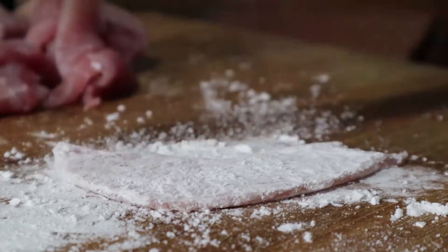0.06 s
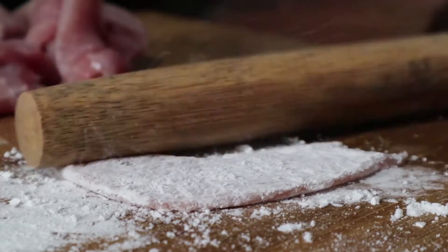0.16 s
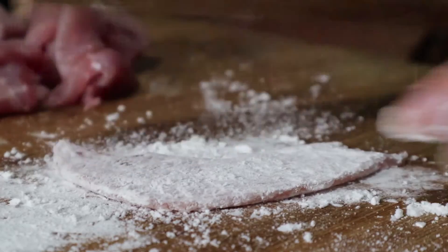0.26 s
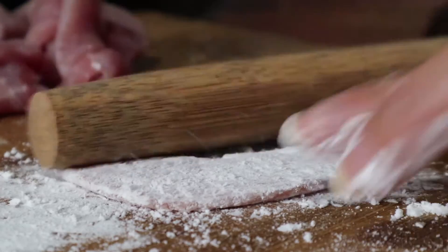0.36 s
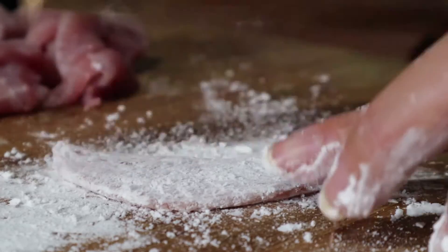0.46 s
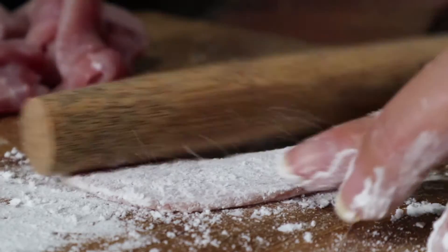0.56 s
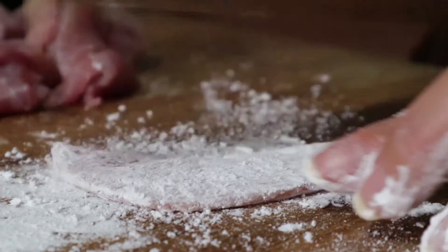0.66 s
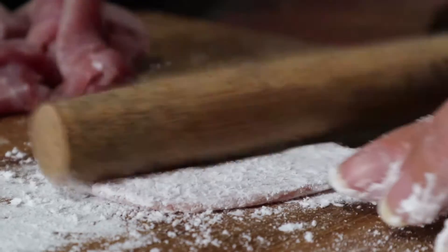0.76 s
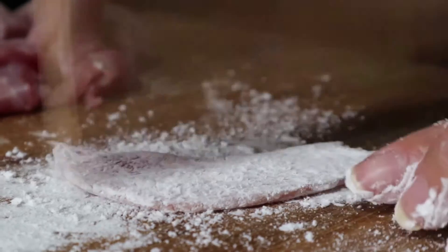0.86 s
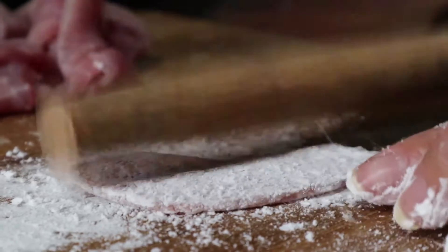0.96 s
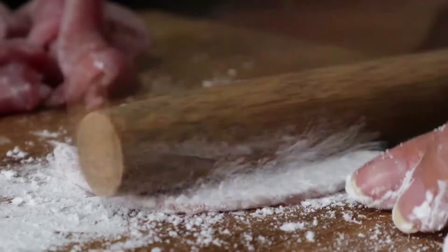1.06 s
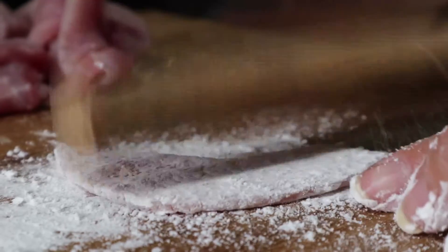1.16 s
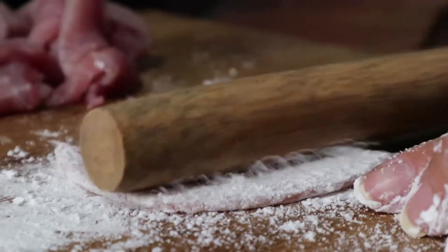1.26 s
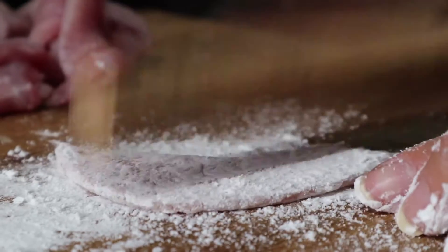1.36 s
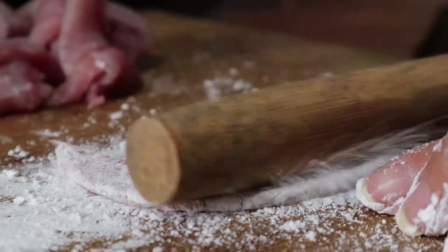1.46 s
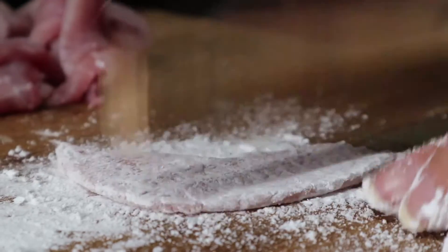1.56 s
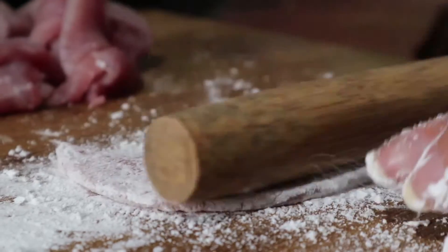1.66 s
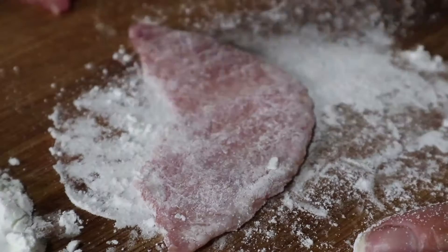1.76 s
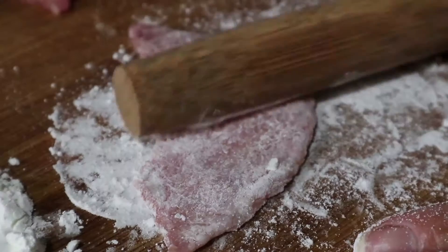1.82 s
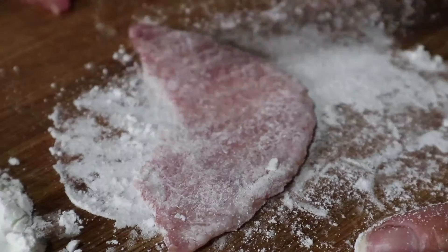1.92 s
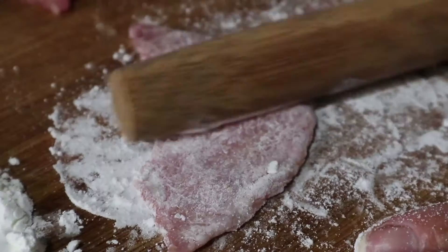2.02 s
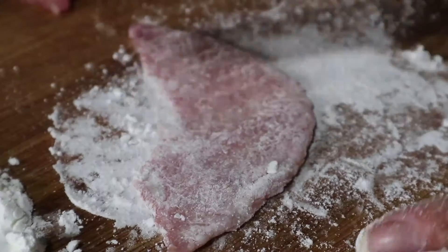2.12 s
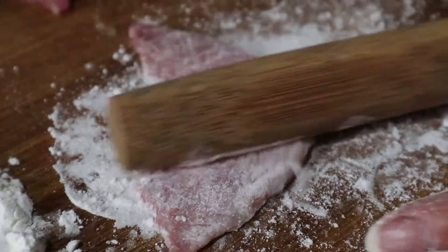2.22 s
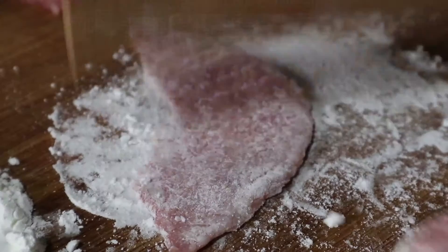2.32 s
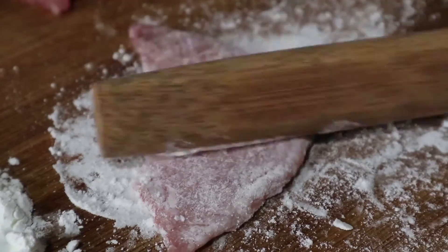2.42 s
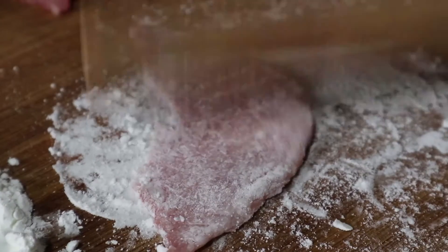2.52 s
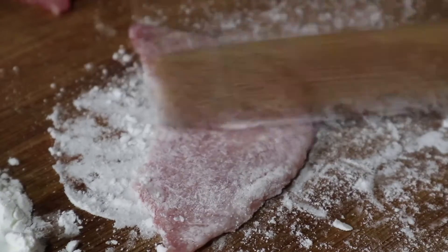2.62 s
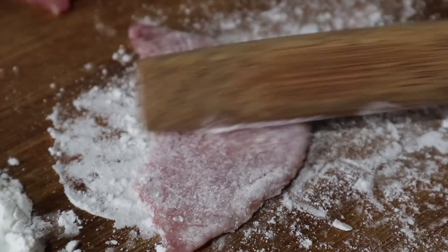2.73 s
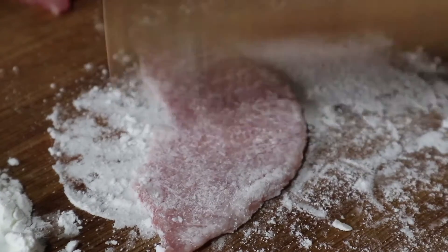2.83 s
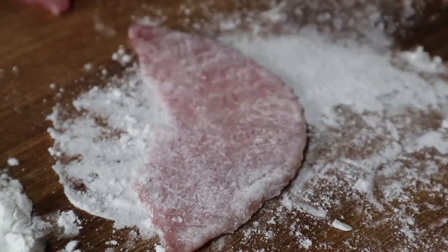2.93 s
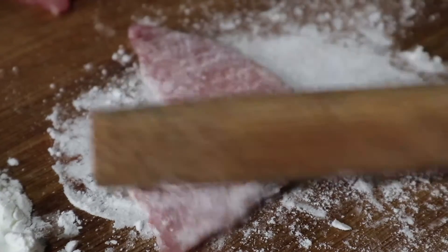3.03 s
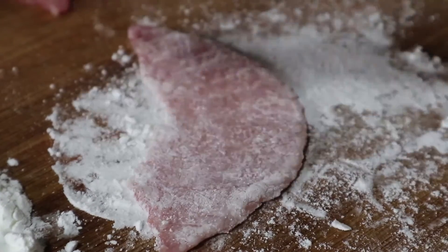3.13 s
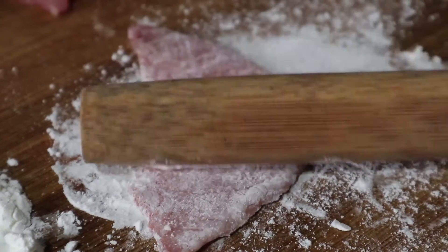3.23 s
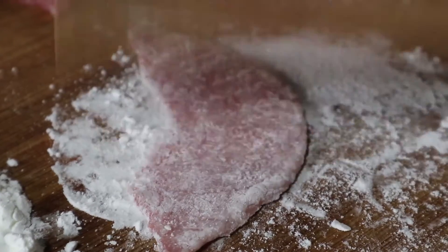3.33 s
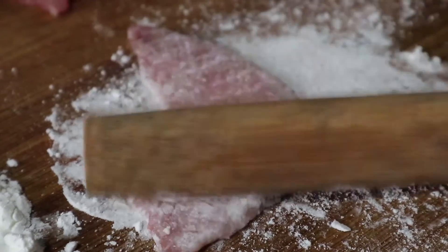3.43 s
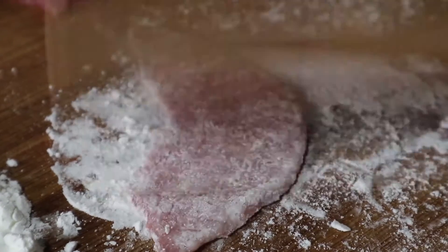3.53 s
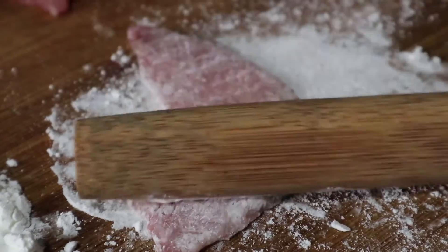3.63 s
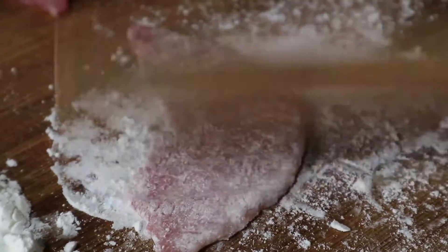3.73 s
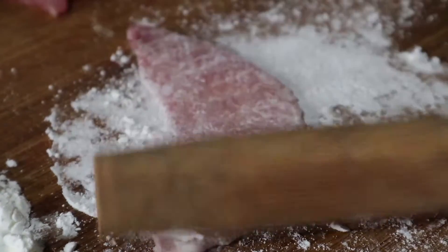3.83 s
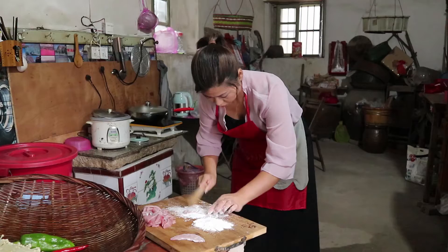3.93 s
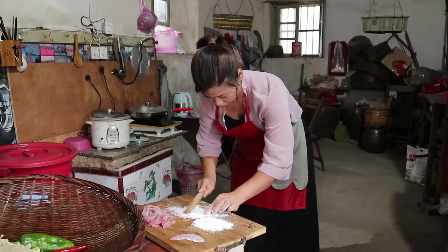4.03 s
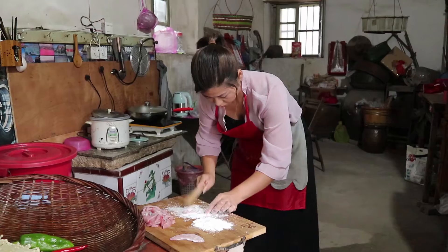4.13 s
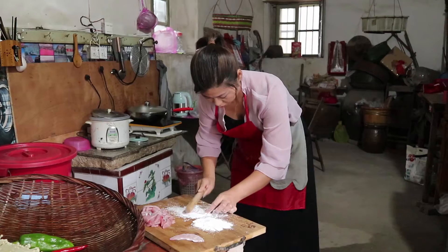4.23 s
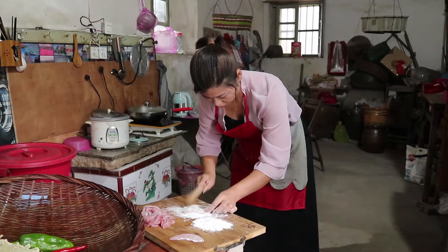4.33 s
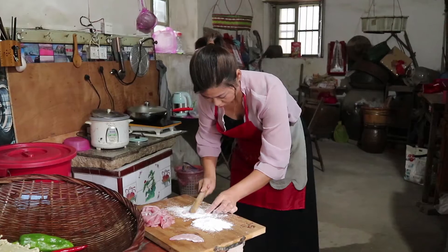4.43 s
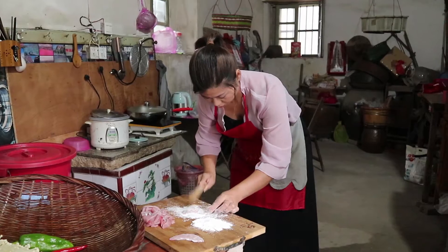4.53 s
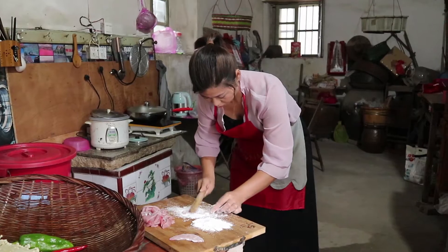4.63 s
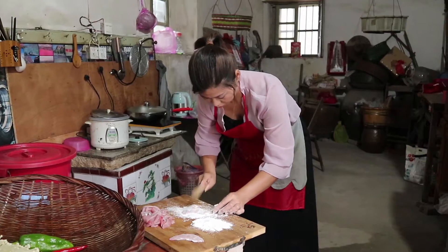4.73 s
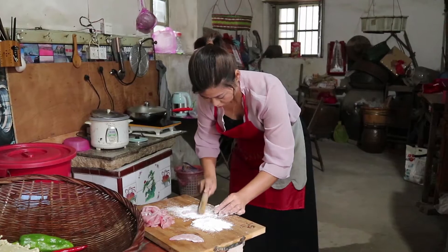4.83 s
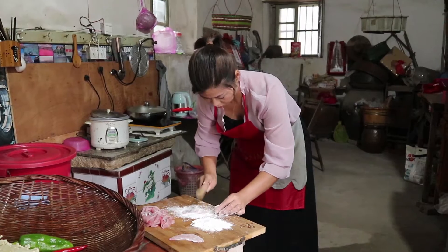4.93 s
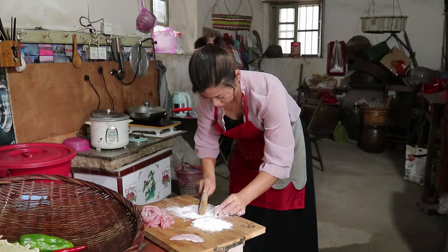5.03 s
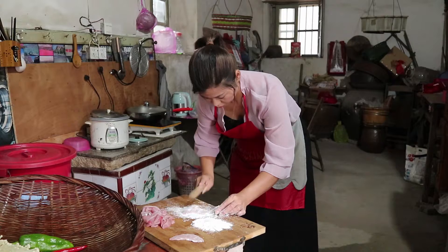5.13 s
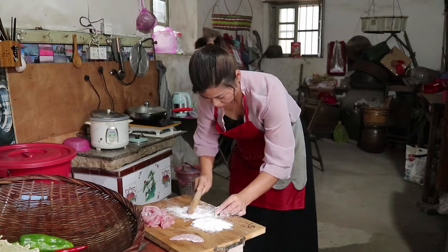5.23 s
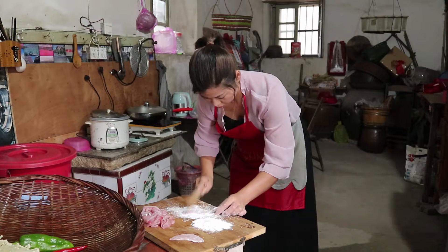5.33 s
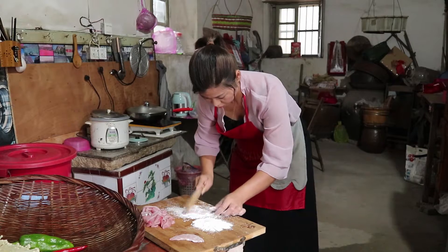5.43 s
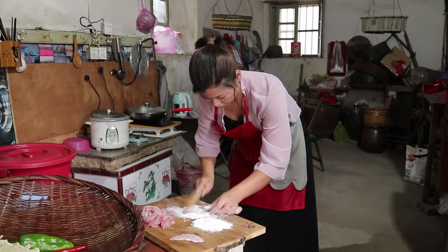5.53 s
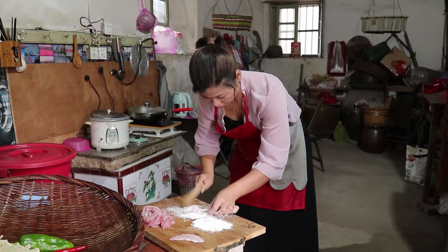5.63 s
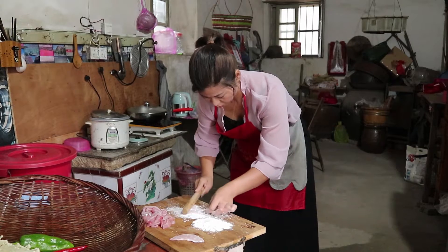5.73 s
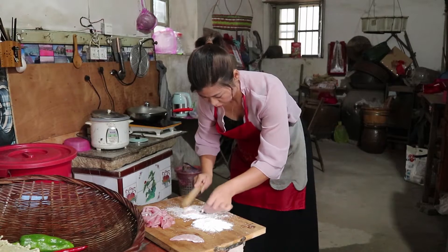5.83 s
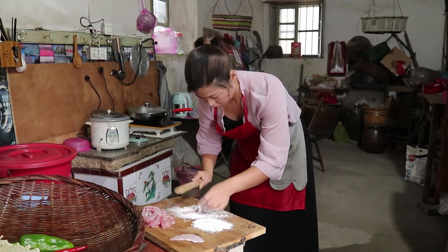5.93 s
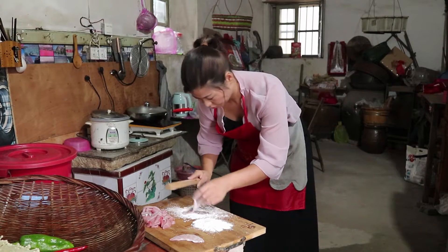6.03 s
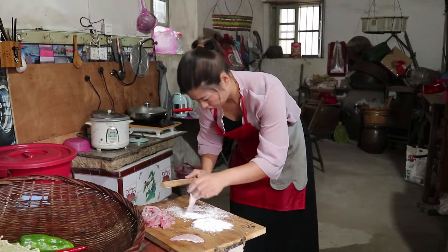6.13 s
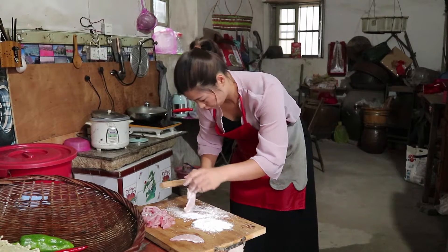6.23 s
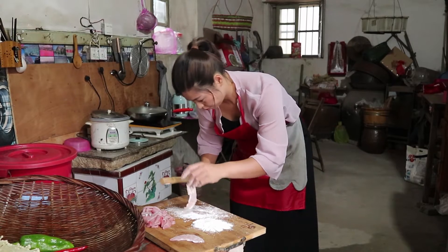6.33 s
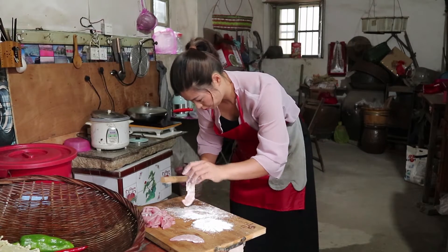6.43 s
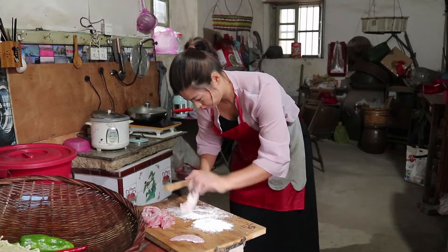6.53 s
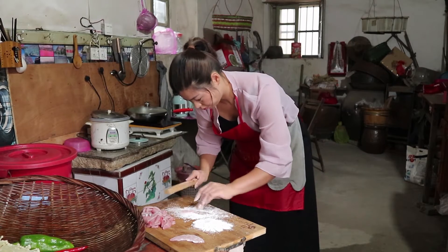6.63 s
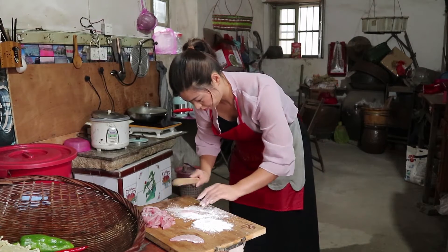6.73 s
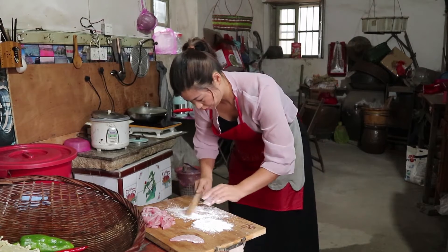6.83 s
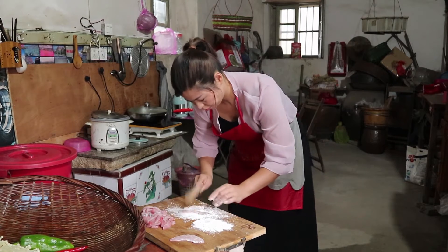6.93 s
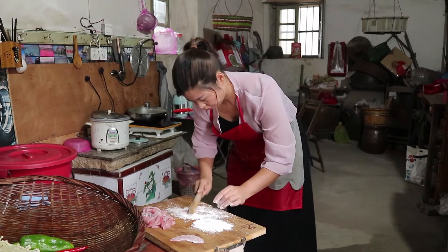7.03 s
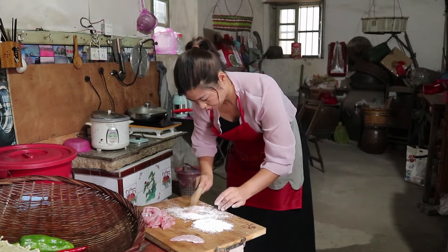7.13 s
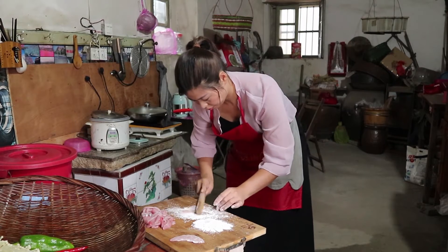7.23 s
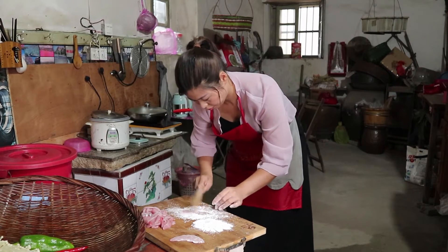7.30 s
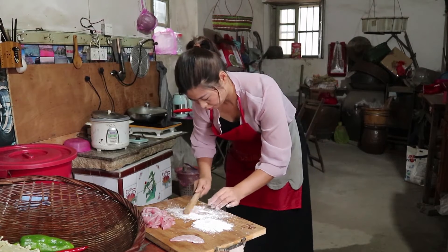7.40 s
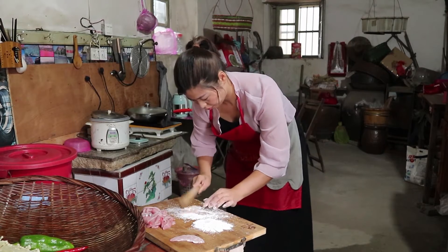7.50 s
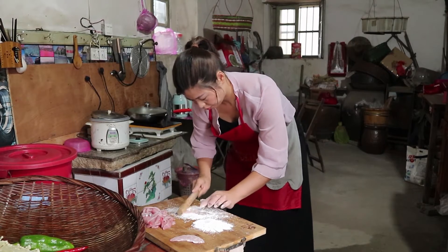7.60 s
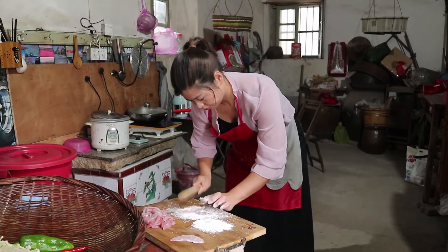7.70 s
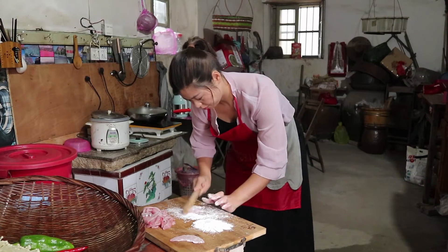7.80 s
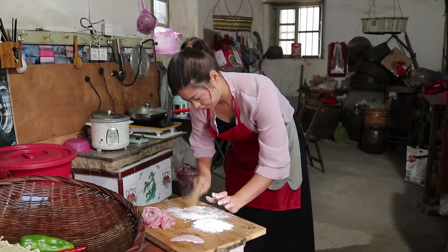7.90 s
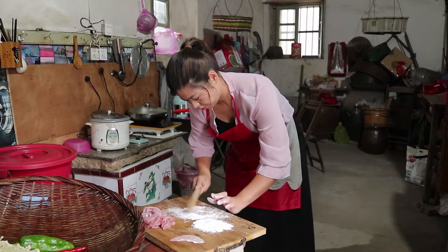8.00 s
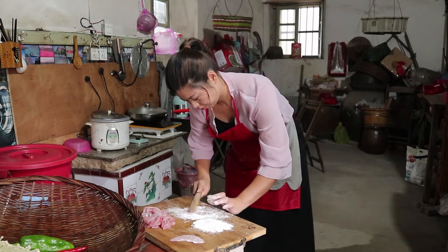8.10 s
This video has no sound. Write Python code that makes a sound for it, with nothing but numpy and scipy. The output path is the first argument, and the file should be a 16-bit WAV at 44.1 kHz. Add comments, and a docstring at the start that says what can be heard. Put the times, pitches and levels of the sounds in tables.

```python
"""Quick blows of a wooden rolling pin on floured meat, about five a second, over faint hum and rumble.
Each blow: a faint gritty noise spurt, damped board modes, a wet slap of noise, sometimes a flat second contact.
Blows on bare wood ring the pin's own modes, and the hardest clip; two early ones of the far blows chink kitchenware.
The blows are close at first; from 4 s they come from across a hard-walled kitchen (noise-tail reverberation).
Shuffle and rustle noise moves the slice, once early and then in a pause, where it is turned over."""
import sys
import numpy as np
from scipy import signal
from scipy.fft import rfft, irfft, next_fast_len
from scipy.io import wavfile
from scipy.ndimage import map_coordinates

SR = 44100
rng = np.random.default_rng(int(sys.argv[2]) if len(sys.argv) > 2 else 0)


def log_audio(samples):
    """Write samples as a 16-bit WAV file to the path given in sys.argv[1]."""
    # one column per channel
    frames = np.atleast_2d(samples).T
    # limit to full scale, then quantise
    limited = np.clip(frames, -1, 1)
    pcm = np.round(limited * 32767).astype(np.int16)
    wavfile.write(sys.argv[1], SR, pcm)


N = 359767
FAR_FROM_S = 4  # blows from here on are heard from across the kitchen


def amp(db):
    """Decibels to gain."""
    return 10 ** (np.asarray(db) / 20)


def unit(x):
    """Scale to rms 1."""
    return x / np.sqrt(np.mean(x ** 2) + 1e-20)


def impulse(x):
    """Scale to energy 1 a channel."""
    return unit(x) / np.sqrt(x.shape[-1])


def along(points, hz):
    """Interpolate (Hz, value) points on a log frequency axis."""
    f, v = np.transpose(points)
    return np.interp(np.log(hz + 1), np.log(f + 1), v)


def level(rows):
    """(s, dB) rows to one gain per sample."""
    return amp(np.interp(np.arange(N) / SR, *np.transpose(rows)))


def filtered(x, response):
    """Multiply the spectrum of x by a response of frequency."""
    n = x.shape[-1]
    padded = next_fast_len(n + 1024, True)
    hz = np.fft.rfftfreq(padded, 1 / SR)
    return irfft(rfft(x, padded) * response(hz), padded)[..., :n]


def coloured(x, points, size=2048):
    """Minimum-phase filter through (Hz, dB) points: causal, so no pre-ringing."""
    gain = amp(along(points, np.fft.rfftfreq(size, 1 / SR)))
    cepstrum = irfft(np.log(gain))
    # fold the cepstrum onto positive time
    cepstrum[1:size // 2] *= 2
    cepstrum[size // 2 + 1:] = 0
    kernel = irfft(np.exp(rfft(cepstrum)))
    return signal.fftconvolve(x, kernel)[:len(x)]


# Diffuse-field coherence. Each row: frequency in Hz, left-right likeness 0..1.
ALIKE = [(30, 1), (70, 1), (200, 0.96), (600, 0.91), (1200, 0.56), (2500, 0.11), (6000, 0.055)]


def diffuse(spectrum, n):
    """Stereo noise from all sides, rms 1: alike in the bass, nearly unrelated in the treble."""
    def mid_side(hz):
        angle = np.arccos(np.clip(along(ALIKE, hz), -1, 1)) / 2
        return amp(along(spectrum, hz)) * [np.cos(angle), np.sin(angle)]

    mid, side = filtered(rng.standard_normal((2, n)), mid_side)
    return unit(np.array([mid + side, mid - side]))


def ring(modes, t, detune, scatter_db):
    """Damped modes; each contact gives them slightly new pitches and strengths."""
    hz, db, t60_s = np.transpose(modes)[:, :, None]
    pitch, strength = rng.standard_normal((2, len(modes), 1))
    decay = amp(db + scatter_db * strength - 60 * t / t60_s)
    return np.sum(decay * np.sin(2 * np.pi * hz * (1 + detune * pitch) * t), axis=0)


def add(track, s, sound):
    """Mix a stereo sound in at time s."""
    start = max(round(s * SR), 0)
    part = sound[:, :N - start]
    track[:, start:start + part.shape[1]] += part


# Low rumble over time. Each row: time in seconds, relative level in dB.
RUMBLE_LEVEL = [(0.0, -48), (0.68, -53.5), (1.95, -44.5), (2.11, -53.5), (3.77, -58.5), (4.29, -46.5),
                (4.82, -47.5), (5.13, -56), (6.11, -57.5), (6.93, -51), (7.56, -43), (8.16, -52)]
# Spectra of rumble and air. Each row: frequency in Hz, relative level in dB.
RUMBLE = [(20, -9.5), (38, -15), (56, 0.5), (80, -3.5), (120, -7), (250, -13), (600, -49), (3000, -110)]
AIR = [(59, -34.5), (100, 1), (172, -11.5), (231, -7), (391, -7), (923, -9.5), (2000, -21.5), (2320, -18),
       (7050, -41), (8700, -69.5), (15000, -76)]


def background(rumble_db=3):
    """Low rumble and faint air: two diffuse noises with slow level curves."""
    rumble = amp(rumble_db) * level(RUMBLE_LEVEL) * diffuse(RUMBLE, N)
    air_level = level([(0, -54.5), (3.95, -58.5), (4.05, -61.5), (8.16, -47.5)])  # s, dB
    return rumble + air_level * diffuse(AIR, N)


# Hum and faint whine. Each row: frequency in Hz, peak level in dB.
HUM = [(50, -60), (3520, -80.5)]


def appliance():
    """A steady mains hum with a thin whine: two sines, equal in both channels."""
    t = np.arange(N) / SR
    return sum(amp(db) * np.sin(2 * np.pi * hz * t) for hz, db in HUM)


# Reverberation time. Each row: frequency in Hz, T60 in seconds.
KITCHEN_T60 = [(100, 0.34), (300, 0.52), (800, 0.47), (2000, 0.45), (5000, 0.53), (12000, 0.11)]
# Spectrum of reflected sound. Each row: frequency in Hz, relative level in dB.
WALLS = [(50, -5.5), (130, 0), (260, -1.5), (385, 4.5), (600, -4), (900, 3), (1200, 8.5), (1700, 1.5),
         (2400, 1.5), (3400, 0), (6000, -6), (9000, -19.5), (14000, -21)]


def kitchen(early_db, early_t60, build):
    """The room's answer: quick early reflections, then a tail whose decay depends on frequency."""
    n = SR // 2
    t = np.arange(n) / SR
    hz, frame_s, bins = signal.stft(diffuse(WALLS, n), SR, nperseg=256)
    decay = amp(-60 * frame_s / along(KITCHEN_T60, hz)[:, None])
    tail = signal.istft(bins * decay, SR, nperseg=256)[1][:, :n]
    early = 1 + amp(early_db - 60 * t / early_t60)
    onset = 1 - np.exp(-(t / build) ** 2)
    return impulse(tail * early * onset)


def answers(count=7):
    """Sets of random room answers, close to the board and across the kitchen."""
    near = [kitchen(early_db=15, early_t60=0.046, build=0.0013) for _ in range(count)]
    far = [kitchen(early_db=-2.5, early_t60=0.047, build=0.0013) for _ in range(count)]
    return near, far


def room_at(s, rooms):
    """Draw one of the answers for the listening place at time s."""
    choice = rooms[int(s >= FAR_FROM_S)]
    return choice[rng.integers(len(choice))]


def placed(sound, room, pan_db, lag_s=.00006):
    """Direct sound reaches the right channel first; the room follows; positive pan favours the left."""
    sides = np.array([[1], [-1]])
    direct = filtered(np.array([sound, sound]), lambda hz: np.exp(-1j * np.pi * hz * lag_s * sides))
    heard = signal.fftconvolve(sound[None], room, axes=1)
    heard[:, :len(sound)] += direct
    return heard * amp(sides * pan_db / 2)


# Flesh and flour spectrum. Each row: frequency in Hz, relative level in dB.
GRAIN = [(300, -24.5), (900, 5), (1600, 6), (3000, -1.5), (5000, -7.5), (9000, -23), (15000, -46.5)]


def squash(t60=.014):
    """A short gritty spurt of flesh and flour: decaying coloured noise."""
    t = np.arange(SR // 16) / SR
    return impulse(coloured(amp(-60 * t / t60) * rng.standard_normal(len(t)), GRAIN))


# Modes of pin and board together. Each row: nominal frequency in Hz, relative level in dB, T60 in seconds.
WOOD = [(142, -22.5, 0.088), (243, -26.5, 0.13), (395.5, -5, 0.043), (529, -12, 0.026), (637, -11.5, 0.03),
        (695, 0.5, 0.019), (797, -2, 0.029), (1090, -16, 0.016), (1374, -19.5, 0.014), (1530, -24, 0.024),
        (2240, -29.5, 0.0098), (3070, -29, 0.004)]


def knock(thump_db, clack_db, slap_db, spread_s=0.000775):
    """Wood modes coloured by contact hardness; bending-wave dispersion delays the lows most."""
    t = np.arange(SR // 8) / SR
    hardness = [  # Hz, dB
        (50, thump_db - 27), (95, thump_db - 16.0), (140, thump_db), (330, thump_db),
        (600, 0), (850, 0), (1000, -2.5), (1150, -0.5),
        (1700, clack_db - 0.5), (2900, clack_db - 0.5),
        (5500, slap_db), (8500, slap_db + 2.5), (12000, slap_db - 11), (15000, slap_db - 11)]
    modes = ring(WOOD, t, detune=0.019, scatter_db=2.5)
    wood = coloured(impulse(modes), hardness)
    # delay = spread_s at 700 Hz, falling as 1 / sqrt(frequency)
    return filtered(wood, lambda hz: np.exp(-4j * np.pi * spread_s * np.sqrt(hz * 700)))


# Listening places. Each row: start in seconds, base thump in dB, room level of a gentle blow in dB.
PLACES = [(0, 1, -6.5), (1.8, -3.5, -7.5), (4, -4, 4), (6.5, -2.5, 5)]
GENTLE_DB = -19  # blow strength above which thump and room level drop
NEAR_DRYING, FAR_DRYING = 0.41, 0.85  # dB of room lost per dB of extra strength
THUMP_PER_STRENGTH, THUMP_PER_HARDNESS = 0.11, 0.18  # dB of thump lost per dB


def blow_colour(s, db, hard_db):
    """Thump and room level in dB: set by place; strength lowers both, hardness the thump."""
    _, thump_db, room_db = [place for place in PLACES if place[0] <= s + .01][-1]
    extra_db = max(db - GENTLE_DB, 0)
    drying = FAR_DRYING if s >= FAR_FROM_S else NEAR_DRYING
    thump_db = thump_db - THUMP_PER_STRENGTH * extra_db - THUMP_PER_HARDNESS * hard_db
    return thump_db, room_db - drying * extra_db


# Board heard from the side. Each row: frequency in Hz, gain in dB.
AFAR = [(160, 0.5), (245, 4.5), (390, -6.5), (520, 2.5), (680, 0), (850, -1), (1000, 5.5), (1150, 2.5),
        (1550, -2), (2200, 2.5), (4000, -2)]
# Stereo position of the blows. Each row: time in seconds, left over right in dB.
SIDE_OF_BLOWS = [(0, 2.5), (4.75, 2), (5.02, -1), (5.3, 1), (8.16, 1.8)]


def from_board(s, sound, room_db, rooms):
    """A sound on the board as it reaches the listening place: far colour, room and pan."""
    if s >= FAR_FROM_S:
        sound = coloured(sound, AFAR)
    pan_db = np.interp(s, *np.transpose(SIDE_OF_BLOWS))
    return placed(sound, amp(room_db) * room_at(s, rooms), pan_db)


# Blows of the pin. Each row: time in seconds, relative strength in dB, then, relative to the strength,
# contact hardness in dB, wet slap in dB.
BLOWS = [(0.0228, -15, -3, -2), (0.222, -8.5, 7, 1.5), (0.4197, -18, -4, -4), (0.6132, -14.5, -3.5, -3),
         (0.7999, -15, -2, -5), (0.9865, -14.5, -4, 5), (1.1698, -15.5, 3.5, -1), (1.3604, -12, 3, 1.5),
         (1.5549, -15.5, 3.5, -0.5), (1.7469, -12.5, 5, 4), (1.8993, 3.5, 4, 6), (2.0913, -4.5, 5, 5),
         (2.2921, -10.5, 6, -0.5), (2.5039, -11.5, 3.5, -5), (2.737, -14.5, 4.5, -3),
         (3.0871, -5.5, 6.5, 3.5), (3.315, -17.5, 4, -6.5), (3.5147, -12.5, 4, -9.5),
         (3.7213, -13.5, 4, 0.5), (3.9327, -12.5, 8.5, -3.5), (4.034, -29.5, -0.5, 4.5),
         (4.1363, -13.5, 10, 5.5), (4.3368, -17, 15, 14.5), (4.5285, -16.5, 4.5, 2), (4.7244, -15, 10, 9.5),
         (4.919, -20, 1.5, 2.5), (5.0199, -12.5, 10.5, 13.5), (5.111, -27, 7.5, -8), (5.217, -28, 16, 9.5),
         (5.289, -27.5, 8, 4), (5.466, -27.5, 3.5, -9), (5.611, -35.5, 17.5, 6), (5.643, -29, 11, 8),
         (5.655, -21.5, 14.5, 17.5), (5.818, -30.5, 5, 1.5), (6.9439, -19.5, 0.5, 14),
         (7.1364, -13, -4, 3.5), (7.3144, -16, 2, -1), (7.4986, -15, 5.5, 0.5), (7.6755, -17, 1.5, 8),
         (7.855, -0.5, 11, 10.5), (8.032, -28.5, 1, -5.5)]
# The pin's length landing flat just after its tip. Each row: time in seconds, relative strength in dB.
FLATS = [(0.427, -22), (0.6194, -16), (0.8089, -16.5), (0.9943, -14.5), (1.1765, -15), (1.5644, -14.5),
         (1.7599, -13), (2.5126, -11), (4.353, -17), (5.125, -31), (5.303, -26), (7.1435, -15)]
# Colour of the flat contact. Each row: frequency in Hz, gain in dB.
FLAT_SLAP = [(60, -34.5), (300, -11.5), (800, -15), (2000, -5), (5000, -13.5), (12000, -15.5)]
LEAD_S, LEAD_DB = 0.0017, -35.5  # a very faint gritty noise spurt starts this long before the knock


def pounding(rooms, force_db=25.5, spurt_db=-26):
    """A faint gritty lead-in, then the pin's tip knocks on the board; at times its length slaps down flat."""
    track = np.zeros((2, N))
    lean = amp([[2], [-2]])  # spurts lean left
    for s, db, hard_db, slap_db in BLOWS:
        thump_db, room_db = blow_colour(s, db, hard_db)
        tip = knock(thump_db, hard_db, slap_db)
        add(track, s - LEAD_S, amp(db + LEAD_DB) * squash() * lean)
        add(track, s, amp(db) * from_board(s, tip, room_db, rooms))
        add(track, s, amp(db + slap_db + spurt_db) * squash() * lean)
    for s, db in FLATS:
        thump_db, room_db = blow_colour(s, db, 0)
        flat = coloured(knock(thump_db, clack_db=3.0, slap_db=0.5), FLAT_SLAP)
        add(track, s, amp(db) * from_board(s, flat, room_db, rooms))
        add(track, s, amp(db + spurt_db) * squash() * lean)
    return amp(force_db) * track


# Blows that catch bare wood. Each row: time in seconds, level in dB, pitch in Hz, left over right in dB.
CLACKS = [(0.2238, -11, 1520, 9), (1.8998, -7.5, 1625, 3.5), (2.0934, -17, 1560, 6), (3.0885, 0.5, 1617, 5),
          (3.936, -10.5, 1590, 8), (4.337, -7, 2345, -1), (4.725, -8.5, 2216, 8.5),
          (5.0206, -0.5, 2800, -4), (5.2195, -10.5, 2840, 0), (5.6551, -1, 2190, 7.5),
          (7.8552, -2, 2150, 11.5)]
# The pin's cluster of modes. Each row: multiple of the pitch, relative level in dB, T60 in seconds.
PIN = [(0.997, 3.5, 0.012), (0.885, -3.5, 0.016), (1.1, -9, 0.021), (1.65, -9, 0.0065)]


def bare_wood(rooms, room_db=-17.5):
    """Where no meat cushions it, the pin itself rings briefly in a cluster of damped modes."""
    track = np.zeros((2, N))
    t = np.arange(SR // 16) / SR
    onset = 1 - np.exp(-t / 0.0006)
    for s, db, hz, pan_db in CLACKS:
        modes = ring(np.multiply(PIN, [hz, 1, 1]), t, detune=.006, scatter_db=1)
        clack = amp(db) * modes * onset
        add(track, s, placed(clack, amp(room_db) * room_at(s, rooms), pan_db))
    return track


# The slice dragged, lifted, shifted, laid back. Each row: peak in seconds, rise in seconds per 20 dB,
# fall in seconds per 20 dB, shuffle in dB, rustle in dB.
MOVES = [(1.868, 0.03, 0.13, -27, -32), (6.33, 0.17, .5, -54.5, -64.5), (6.6, 0.26, 0.61, -56, -72),
         (6.92, 0.36, 0.35, -45, -62)]
# Spectra of hand shuffle and floury rustle. Each row: frequency in Hz, relative level in dB.
SHUFFLE = [(30, -4.5), (76, -1.5), (150, -11.5), (230, -5), (400, -14), (900, -24.5), (2500, -30),
           (6000, -56.5), (12000, -87)]
PEEL = [(300, -13.5), (900, 6), (2500, -9.5), (4500, -22.5), (7000, -31), (12000, -47.5)]


def turning(rate_hz=45, uneven_db=3):
    """Each move of the slice swells and fades: a soft shuffle of hands and an uneven floury rustle."""
    t = np.arange(N) / SR
    shuffle, rustle = np.zeros((2, N))
    for s, rise_s, fall_s, shuffle_db, rustle_db in MOVES:
        swell = amp(-20 * np.maximum((s - t) / rise_s, (t - s) / fall_s))
        shuffle += amp(shuffle_db) * swell
        rustle += amp(rustle_db) * swell
    steps = rng.standard_normal(int(N * rate_hz / SR) + 4)
    catches = map_coordinates(steps, [t * rate_hz], order=1)
    rustle *= amp(uneven_db * catches)
    return shuffle * diffuse(SHUFFLE, N) + rustle * diffuse(PEEL, N)


# Hard knocks that set kitchenware ringing. Each row: time in seconds, level in dB.
JOLTS = [(5.0189, -11), (5.217, -21.5)]
# Kitchenware modes. Each row: nominal frequency in Hz, relative level in dB, T60 in seconds.
WARE = [(948, -1.5, 0.06), (1390, -20, .06), (3150, -20.5, 0.28), (3270, -28.5, 0.31), (3680, -14, 0.031),
        (4090, -29, .2), (4170, -29.5, 0.24), (6480, -39.5, .2)]


def kitchenware(rooms):
    """Something hard beside the board chinks after a jolt: damped modes in the room."""
    track = np.zeros((2, N))
    t = np.arange(SR // 8) / SR
    for s, db in JOLTS:
        chink = amp(db) * ring(WARE, t, detune=.001, scatter_db=2)
        add(track, s, placed(chink, amp(-5.0) * room_at(s, rooms), pan_db=3))
    return track


def scene():
    """Everything that sounds in the kitchen."""
    rooms = answers()
    room_tone = background() + appliance()
    blows = pounding(rooms) + bare_wood(rooms)
    return room_tone + blows + turning() + kitchenware(rooms)


def record(dry, top_hz=16000):
    """The microphone overloads: peaks clip at full scale; then a steep low-pass at top_hz."""
    return filtered(np.clip(dry, -1, 1), lambda hz: 1 / (1 + (hz / top_hz) ** 80))


dry = scene()
out = record(dry)
log_audio(out)
```